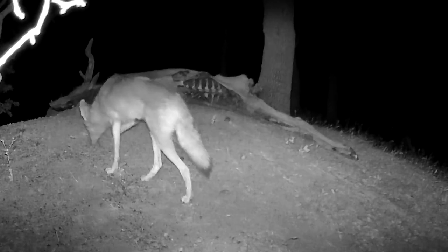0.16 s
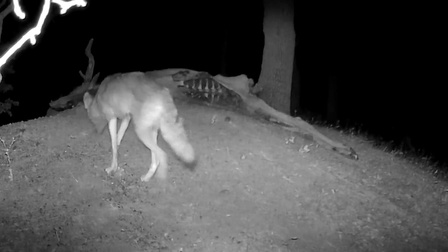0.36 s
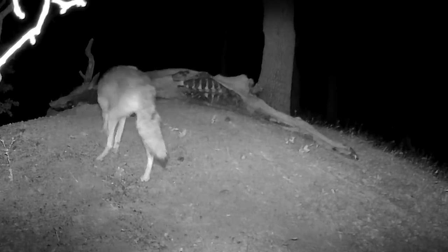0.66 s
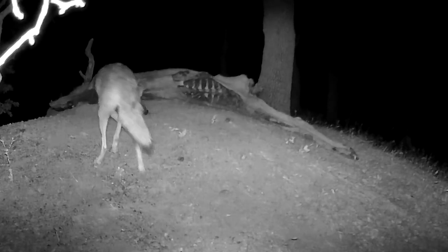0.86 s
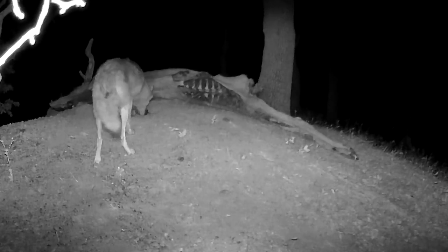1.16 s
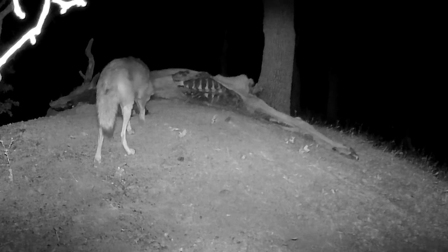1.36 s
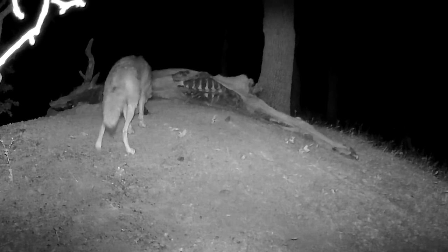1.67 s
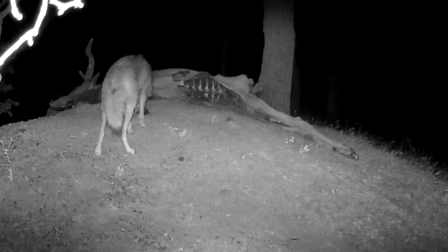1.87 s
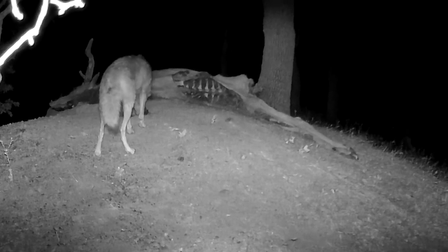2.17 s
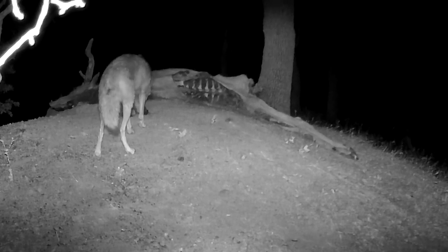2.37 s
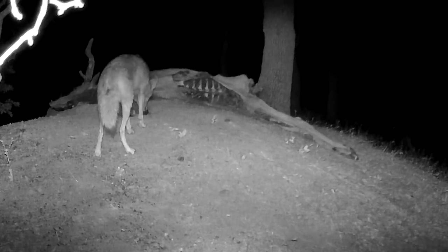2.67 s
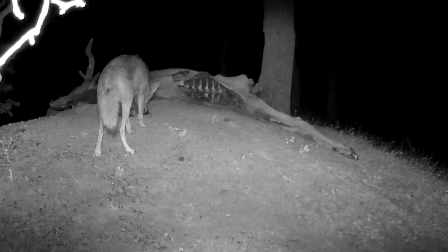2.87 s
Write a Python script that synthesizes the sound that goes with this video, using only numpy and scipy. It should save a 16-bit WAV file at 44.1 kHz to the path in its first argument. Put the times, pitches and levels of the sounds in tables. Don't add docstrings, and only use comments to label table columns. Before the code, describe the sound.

One close cricket chirps brightly in regular three-pulse bursts, lightly echoing among trees, over a continuous high buzz of many trilling insects, fainter distant crickets, soft low rumble and slight microphone hiss, outdoors at night.

```python
import sys
import numpy as np
from scipy import signal
from scipy.fft import rfft, irfft, next_fast_len
from scipy.io import wavfile
from scipy.ndimage import uniform_filter1d, map_coordinates

SR = 44100
rng = np.random.default_rng(int(sys.argv[2]) if len(sys.argv) > 2 else 0)


def convert_level_to_amplitude(level_db):
    exponent = np.asarray(level_db, float) / 20
    return 10 ** exponent


def int16_out(signal):
    q = np.round(np.clip(np.atleast_2d(signal).T, -1, 1) * 32767)
    wavfile.write(sys.argv[1], SR, q.astype(np.int16))


N = 132300
T = np.arange(N) / SR
SIDE = np.array([[.5], [-.5]])

# start t/s, tempo stretch [ratio], level/dB
CHIRPS = [
    (-.0575, 1, -1.6),
    (.2115, .99, -1.4),
    (.5832, .985, 0),
    (.8704, .995, 0),
    (1.1481, 1.01, 0),
    (1.5672, 1, -.4),
    (1.9158, 1.02, -1.1),
    (2.2351, 1.005, 0),
    (2.5565, 1.005, .3),
    (2.9770, 1, 1.7),
]
# delay t/s, length t/s, level/dB, pitch f/Hz, climb f/Hz
STROKES = [
    (0, .019, -3.9, 5465, -30),
    (.0324, .023, -1, 5450, 125),
    (.0699, .0239, 0, 5445, 215),
]
# stroke rate f/Hz, first crest t/s
TRILL_BEATS = [(22.32, .0105), (19.42, .034), (20.42, .0005), (20.07, .0485), (20.89, .009)]
# pitch f/Hz, level/dB, left over right level/dB, left lead t/s
TRILLERS = [(9100, -65.5, 5.5, 5e-5), (9240, -78, 9.5, -0.019), (8820, -67.5, 3, 0.004),
            (8280, -69.5, 9.5, 5.5e-5), (9010, -69.5, -5.5, 0.0038)]
# f/Hz, level/dB
TRILL_BODY = [(6500, 25), (7500, 2.5), (8200, 0), (9450, 0.5), (9700, -14), (10000, -46)]
# order [multiple of shaft rate], level/dB
DRONE_ORDERS = [(2, -75), (3, -80.5), (4, -74), (6, -76.5), (7, -84), (10, -82.5)]
# t/s, shaft f/Hz
SHAFT_SPEED = [(0.0, 99.3), (0.23, 92.1), (0.34, 98.02), (0.61, 100.7), (0.8, 95.5), (1.5, 100.6),
               (2.43, 94.71), (2.51, 99.35), (3.0, 96.44)]
# t/s, level/dB
TRAFFIC = [(0.0, -65), (1.23, -62), (1.67, -63), (2.06, -62), (3.0, -63)]
# f/Hz, level/dB (per Hz)
WASH_SPECTRUM = [(65, -34), (110, -2.5), (259, -5.5), (389, -3.5), (439, -8), (584, -7), (629, -9),
                 (4000, -24), (5200, -60), (8800, -120)]
# f/Hz, level/dB
HISS_SPECTRUM = [(3500, -5), (4200, -1), (5300, 9), (6300, -5), (7300, 1), (9700, -12.5), (13000, -13.5),
                 (15700, -11.5)]
# f/Hz, correlation [-1..1]
PORT_LIKENESS = [(30, .55), (70, .5), (250, .6), (700, .5), (1500, .35), (3000, -.05), (8000, 0)]
# t/s, level/dB, pitch f/Hz
SWAY = [(0.0, -74.5, 16.131), (0.29, -30, 15.5), (0.53, -42.5, 15.5), (0.62, -52.5, 17.9),
        (0.67, -45, 18.2), (0.97, -51, 18.2), (1.05, -40, 19.9), (1.15, -43.5, 16.5), (1.3, -39.5, 15.5),
        (1.41, -53, 14.27), (1.65, -44, 15.986), (1.76, -32, 15.27), (2.05, -37, 15.5), (2.16, -51, 14.987),
        (2.3, -42, 15.5), (2.39, -58, 15.24), (2.46, -39.5, 15.62), (3.0, -52.5, 16.4)]
# t/s, level/dB
GUSTS = [(0.0, -65), (0.36, -64), (0.48, -68), (0.82, -72), (0.98, -57), (0.99, -59), (1.54, -69),
         (1.7, -55.5), (1.77, -61), (1.95, -58), (2.32, -70), (2.36, -59), (2.97, -66.5), (3.0, -58)]
# f/Hz, level/dB
BUFFET_SPECTRUM = [(14, -52), (24, 2), (35, -6.5), (50, -15), (65, -6.5), (110, -24.5), (200, -49)]
# t/s, level/dB
TWIGS = [
    (1.7571, -43),
    (2.4336, -42.5),
]
# f/Hz, level/dB
TICK_SPECTRUM = [(3000, -30), (4500, -3), (7000, -3), (9800, 0), (11000, -12), (16000, -16)]
# f/Hz, level/dB
REBOUND_SPECTRUM = [(3000, -30), (5000, -4), (10000, -4), (14500, -2)]

CRICKET_DB, OCTAVE_DB, CRICKET_PAN_DB, CRICKET_LEAD_S = -34, -39, 4, 6.8e-5
STROKE_CREST, OVERSHOOT_HZ, SETTLE, SAG_HZ, SAG_POWER = .62, 130, .12, 280, 7
KNOCK_HZ, KNOCK_DB, KNOCK_WIDTH = 5080, -21, .08
CRICKET_ECHO_DB, LEAF_SMEAR, TREES_T60_S = -19, .59, .85
GROUND_DB, GROUND_T60_S = -16, .08
TRILL_S, TRILL_FALL_HZ, TRILL_ROUGH, TRILL_ECHO_DB = .018, 950, .55, -3
CROWD_HZ, CROWD_SPREAD_HZ, CROWD_DB, CROWD_PAN_DB = 8893, 300, -63.5, -2
FAR_HZ, FAR_SPREAD_HZ, FAR_DB, FAR_STROKE_S = 4805, 100, -70.5, .025
HISS_DB = -68.5
TICK_S, REBOUND_S, REBOUND_DB = .0009, .006, -14
TOP_HZ = 15730


def unit(x):
    return x / np.sqrt(np.mean(x ** 2) + 1e-20)


def along(points, hz):
    f, v = np.transpose(points)
    return np.interp(np.log(hz + 1), np.log(f + 1), v)


def over_time(points):
    return np.interp(T, *np.transpose(points))


def phase(hz):
    return 2 * np.pi * np.cumsum(hz) / SR


def wobble(rate_hz):
    coarse = T[::8]
    knots = rng.standard_normal(4000)
    return np.interp(T, coarse, map_coordinates(knots, [coarse * np.clip(rate_hz, 0, 1200)]))


def filtered(x, response):
    m = next_fast_len(N + 8192)
    return irfft(rfft(x, m) * response(np.fft.rfftfreq(m, 1 / SR)), m)[..., :N]


def placed(x, pan_db, lead_s):
    return filtered(x, lambda hz: convert_level_to_amplitude(pan_db * SIDE) * np.exp(2j * np.pi * hz * lead_s * SIDE))


def echoes(x, t60_s):
    t = np.arange(SR) / SR
    tail = rng.standard_normal((2, SR)) * convert_level_to_amplitude(-60 * t / t60_s) * (1 - np.exp(-t / .003))
    tail = tail / np.linalg.norm(tail[0])
    return signal.fftconvolve(np.atleast_2d(x), tail, axes=1)[:, :N]


def rush(spectrum):
    def mid_side(hz):
        angle = np.arccos(np.clip(along(PORT_LIKENESS, hz), -1, 1)) / 2
        return convert_level_to_amplitude(along(spectrum, hz)) * [np.cos(angle), np.sin(angle)]
    mid, side = filtered(rng.standard_normal((2, N)), mid_side)
    return unit(np.array([mid + side, mid - side]))


def swell(u, crest):
    u = np.clip(u, 0, 1)
    rise = (u / crest) ** .62
    shut = np.abs(np.cos(np.pi / 2 * (u - crest) / (1 - crest))) ** 1.1
    return np.where(u < crest, rise, shut)


def cricket():
    level, knock, hz = np.zeros(N), np.zeros(N), np.full(N, 5400.)
    for start, stretch, db in CHIRPS:
        for delay, length, stroke_db, pitch_hz, climb_hz in STROKES:
            t = T - start - delay * stretch
            on = np.abs(t - length / 2) < length
            u = t[on] / length
            level[on] += convert_level_to_amplitude(db + stroke_db) * swell(u, STROKE_CREST)
            knock[on] += convert_level_to_amplitude(db + 2 * stroke_db + KNOCK_DB) * np.exp(-((u - 1) / KNOCK_WIDTH) ** 2)
            u = np.clip(u, 0, 1)
            tone_hz = pitch_hz + OVERSHOOT_HZ * np.exp(-u / SETTLE) + climb_hz * u
            tone_hz -= (SAG_HZ + climb_hz) * u ** SAG_POWER
            hz[on] = np.where(u > 0, tone_hz, hz[on])
    turn = phase(hz + 10 * wobble(500))
    tone = np.sin(turn) + convert_level_to_amplitude(OCTAVE_DB) * np.sin(2 * turn + wobble(300))
    song = level * convert_level_to_amplitude(.4 * wobble(600)) * tone
    song = convert_level_to_amplitude(CRICKET_DB) * (song + knock * np.sin(2 * np.pi * KNOCK_HZ * T))
    smeared = song * (1 + LEAF_SMEAR * wobble(500))
    trees = echoes(smeared, TREES_T60_S) * convert_level_to_amplitude(2.06 * np.array([wobble(40), wobble(40)]))
    ground = echoes(song, GROUND_T60_S)
    direct = placed(song, CRICKET_PAN_DB, CRICKET_LEAD_S)
    return direct + convert_level_to_amplitude(CRICKET_ECHO_DB) * trees + convert_level_to_amplitude(GROUND_DB) * ground


def trill(rate_hz, crest_s, pitch_hz, length_s, fall_hz):
    beat = (T - crest_s + .3 * length_s) * rate_hz + .02 * wobble(4)
    u = beat % 1 / rate_hz / length_s
    hz = pitch_hz - fall_hz * (np.clip(u, 0, 1) ** 1.8 - .1) + 40 * wobble(20)
    size = swell(u, .3) * convert_level_to_amplitude(.7 * wobble(22)) * (1 + TRILL_ROUGH * wobble(900))
    return unit(size * np.sin(phase(hz)))


def trillers():
    near = 0
    for (rate_hz, crest_s), (hz, db, pan_db, lead_s) in zip(TRILL_BEATS, TRILLERS):
        song = trill(rate_hz, crest_s, hz, TRILL_S, TRILL_FALL_HZ)
        near = near + placed(convert_level_to_amplitude(db) * song, pan_db, lead_s)
    crowd = 0
    for a, b, c in rng.random((16, 3)):
        offset = (4 * c - 2) * (.5 + .5 * abs(2 * c - 1))
        crowd = crowd + trill(17 + 8 * a, b, CROWD_HZ + CROWD_SPREAD_HZ * offset, TRILL_S, TRILL_FALL_HZ)
    far = unit(echoes(crowd, TREES_T60_S)) * convert_level_to_amplitude(CROWD_DB + CROWD_PAN_DB * SIDE)
    mix = near + convert_level_to_amplitude(TRILL_ECHO_DB) * echoes(near, TREES_T60_S) + far
    return filtered(mix, lambda hz: convert_level_to_amplitude(along(TRILL_BODY, hz)))


def far_crickets():
    songs = 0
    for a, b, c in rng.random((8, 3)):
        singing = (T * (2.6 + a) + b) % 1 < .35
        pitch_hz = FAR_HZ + FAR_SPREAD_HZ * (2 * c - 1)
        songs = songs + trill(28 + 6 * a, b, pitch_hz, FAR_STROKE_S, 150) * singing
    mix = unit(echoes(songs, TREES_T60_S)) + .66 * unit(songs)
    return convert_level_to_amplitude(FAR_DB) * unit(mix) * convert_level_to_amplitude([[-1.1], [1.1]])


def drone():
    turn = phase(over_time(SHAFT_SPEED))
    lines = 0
    for order, db in DRONE_ORDERS:
        lines = lines + convert_level_to_amplitude(db + 3 + 2.2 * wobble(5)) * np.sin(order * turn + .45 * wobble(12))
    return lines * convert_level_to_amplitude([[-.6], [.6]])


def air():
    wash_db = over_time(TRAFFIC) + .83 + np.array([[-.6], [.6]])
    hiss = rush([(3000, -120)] + HISS_SPECTRUM)
    return convert_level_to_amplitude(wash_db) * rush(WASH_SPECTRUM) + convert_level_to_amplitude(HISS_DB) * hiss


def sway():
    s, db, hz = np.transpose(SWAY)
    turn = phase(np.interp(T, s, hz))
    skew = .37 + .49 * wobble(2.994)
    rock = convert_level_to_amplitude(np.interp(T, s, db) + 5) * np.sin([turn + skew, turn - skew])
    rock = rock * convert_level_to_amplitude(1.2 * wobble(2.4872) * [[1], [-1]])
    buffet_db = uniform_filter1d(over_time(GUSTS), size=1800) + 3.5
    return rock + convert_level_to_amplitude(buffet_db) * rush(BUFFET_SPECTRUM)


def twigs():
    def snap(late_s, loss_db, spectrum):
        bursts = sum(convert_level_to_amplitude(db + loss_db) * np.exp(-((T - s - late_s) / TICK_S) ** 2) for s, db in TWIGS)
        return filtered(bursts * rng.standard_normal(N), lambda hz: convert_level_to_amplitude(along(spectrum, hz)))
    ticks = snap(0, 0, TICK_SPECTRUM) + snap(REBOUND_S, REBOUND_DB, REBOUND_SPECTRUM)
    return placed(ticks, .98, 1e-5)


def scene():
    return cricket() + trillers() + far_crickets() + drone() + air() + sway() + twigs()


def low_pass(x):
    return signal.sosfilt(signal.butter(12, 15950, fs=SR, output="sos"), x)


def record(dry):
    mix = filtered(dry, lambda hz: hz < TOP_HZ)
    return low_pass(mix)


dry = scene()
out = record(dry)
int16_out(out)
```